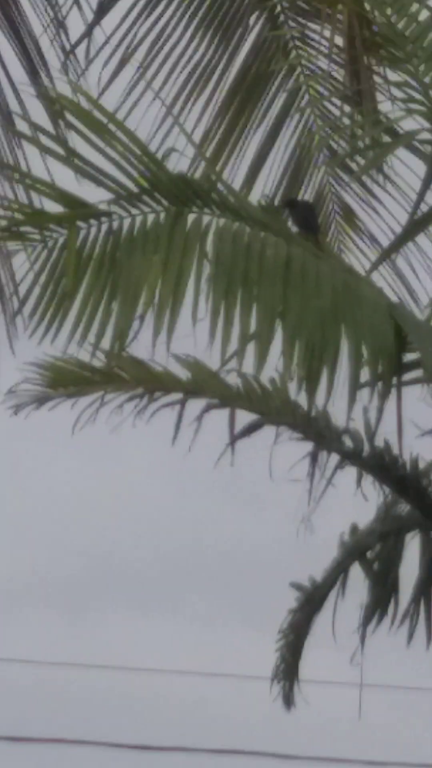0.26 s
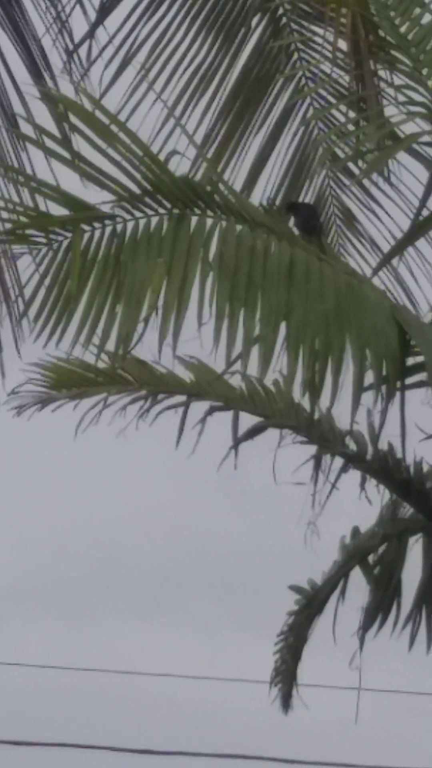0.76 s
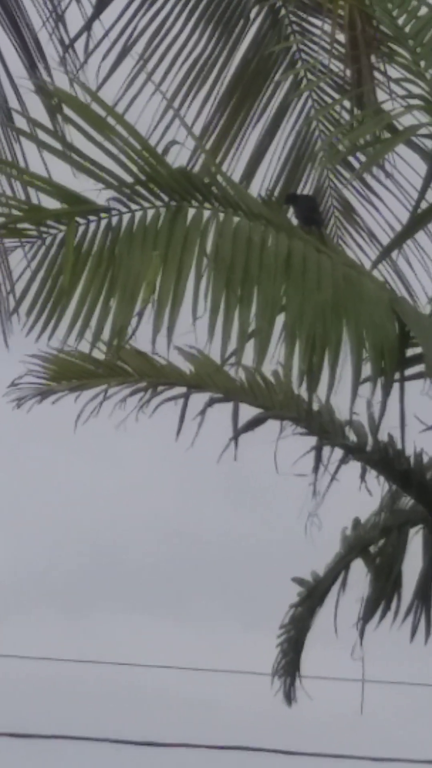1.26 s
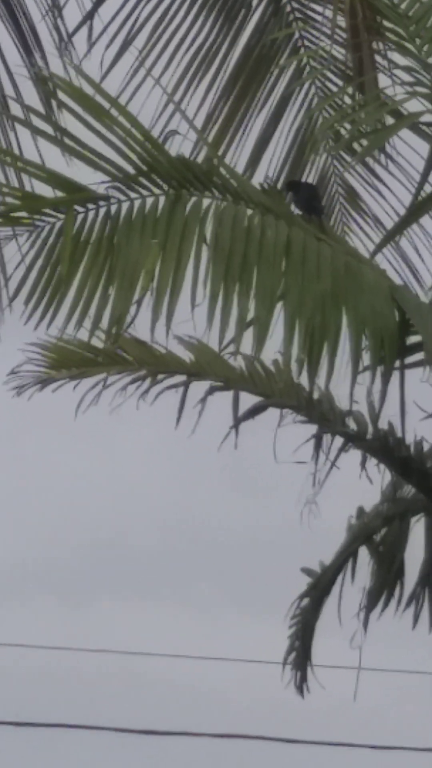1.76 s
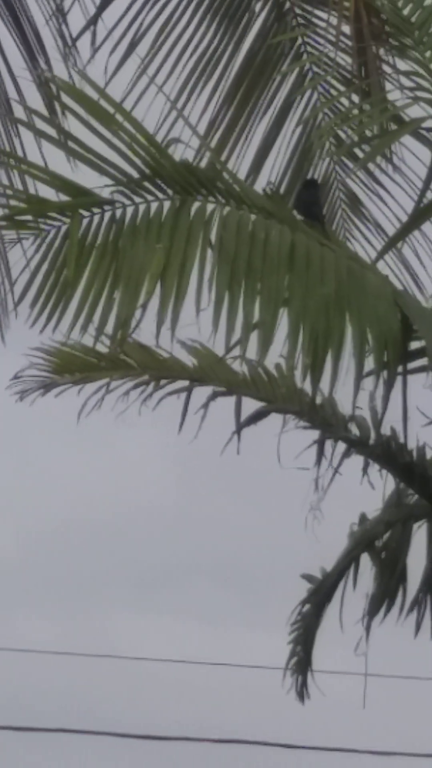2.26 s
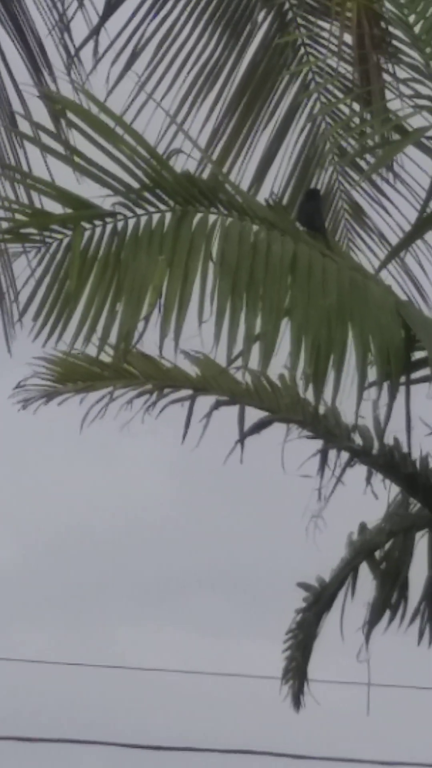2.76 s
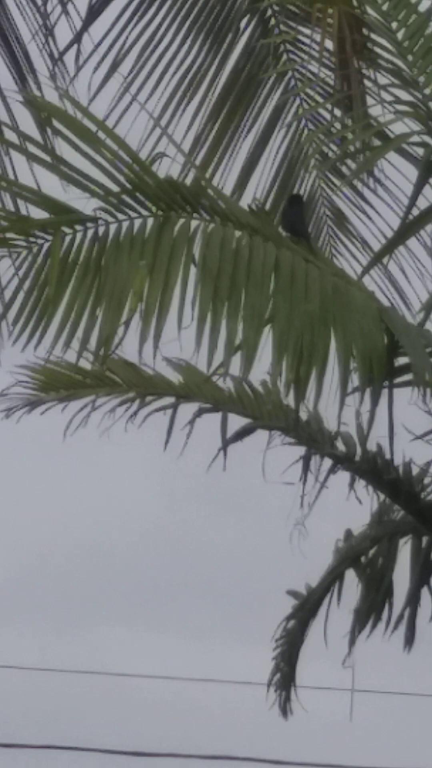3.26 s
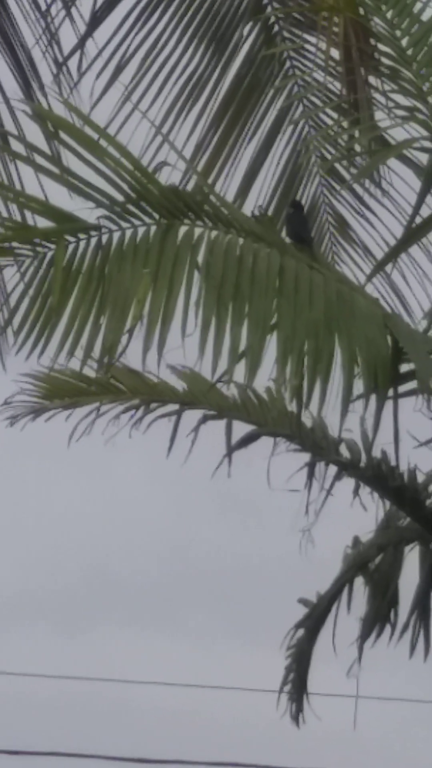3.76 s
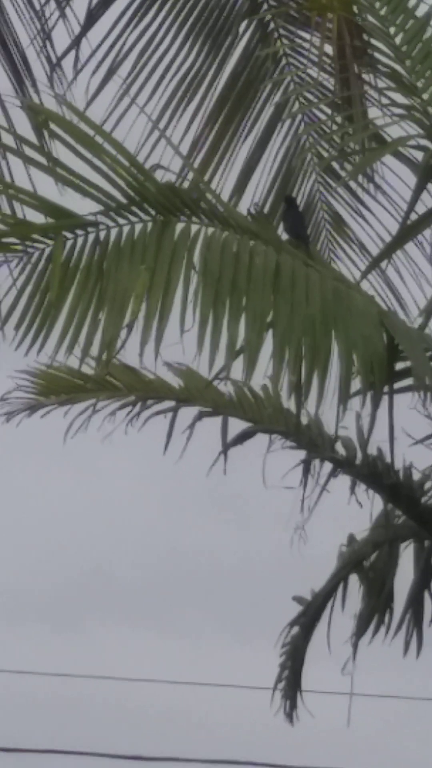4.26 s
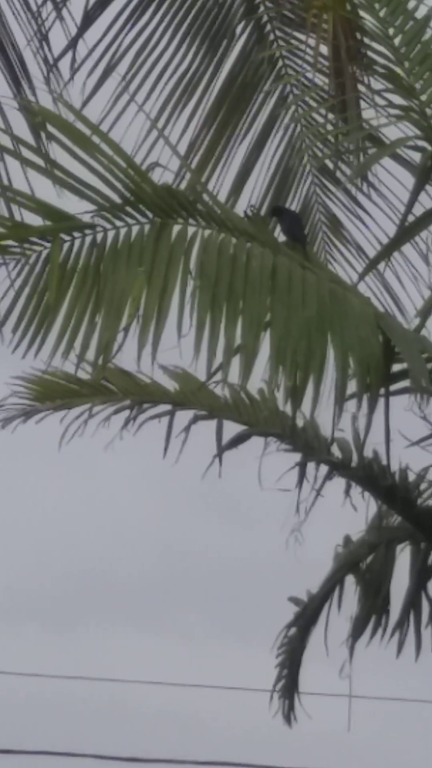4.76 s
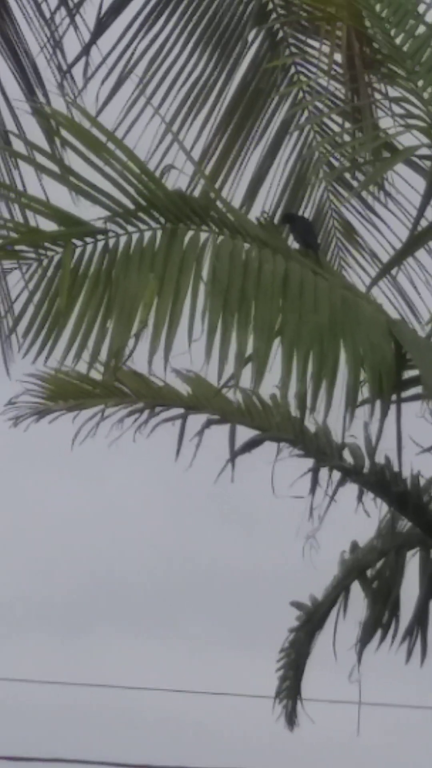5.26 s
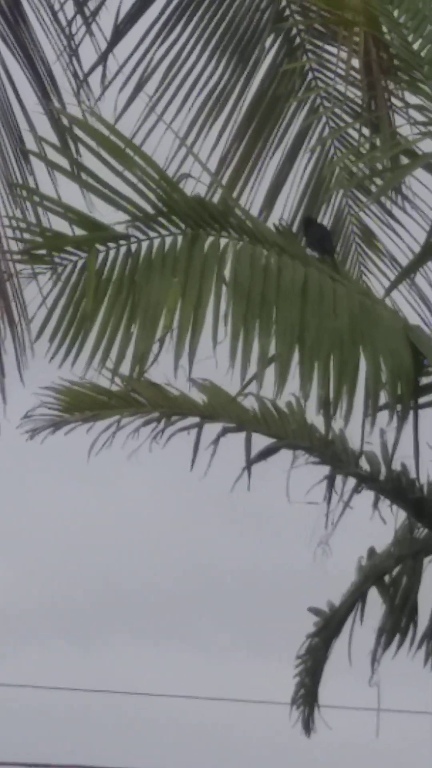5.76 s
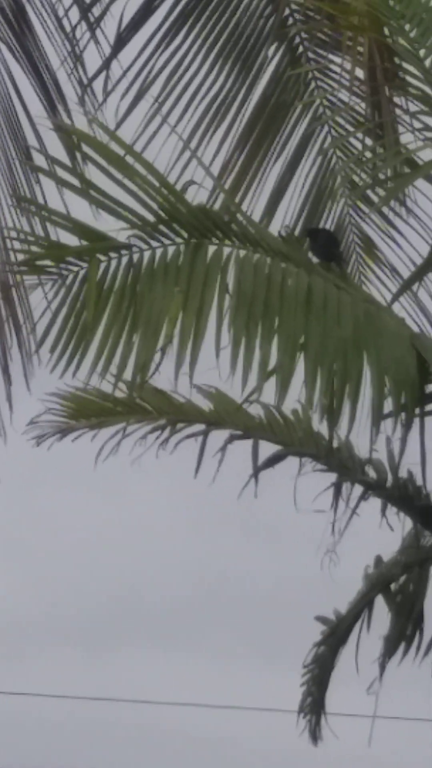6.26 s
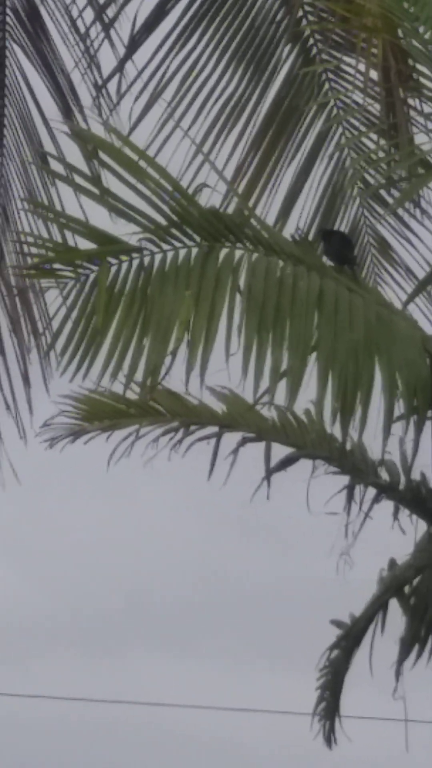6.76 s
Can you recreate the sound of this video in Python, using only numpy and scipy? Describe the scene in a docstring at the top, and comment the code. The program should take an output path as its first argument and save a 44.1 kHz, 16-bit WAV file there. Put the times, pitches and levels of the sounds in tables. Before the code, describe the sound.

Birds call from palms near houses on a still, grey day. Mellow dipping whistles lead throughout the first five and a half seconds, then smaller chirrups and faint chips carry on. One squealing call arches high just before four seconds. Behind them, slow far-off whooshes recur steadily like work strokes, amid soft rumble, leaf hiss and a thin insect band. The outdoor stereo microphone catches clear wall echoes and a little hiss.

```python
"""Dawn birds among palms and houses

A near songbird whistles dipping phrases: frequency-modulated sines that sink, turn and settle.
Other birds chirp, trill and chip further off, with bent, two-voiced or rapidly shaken sines.
Walls throw every note back, by convolution with a decaying noise tail. A dull whoosh of filtered
noise, like a slow work stroke, repeats far away over low town rumble, leaf hiss and insects.
"""
import sys
import numpy as np
from scipy import signal
from scipy.fft import rfft, irfft
from scipy.io import wavfile
from scipy.ndimage import uniform_filter1d

SR = 44100
rng = np.random.default_rng(int(sys.argv[2]) if len(sys.argv) > 2 else 0)


def transcribe(u):
    """Save the signal u as a 16-bit wav file named by the first command-line argument.

    u: samples, shape (n,) or (channels, n), limited to [-1, 1]; the rate is SR.
    q: integer samples, one column per channel.
    """
    v = np.clip(np.atleast_2d(u).T, -1, 1)
    q = np.round(v * 32767).astype(np.int16)
    wavfile.write(sys.argv[1], SR, q)


def boost(x):
    """Linear amplitude factor 10**(x/20) for a level x in decibels (scalar or array-like)."""
    u = np.asarray(x, float) / 20
    return 10 ** u


N = 309582  # samples


def evened(x):
    """Normalisation: scales a signal to rms 1."""
    return x / np.sqrt(np.mean(x ** 2) + 1e-20)


def read(points, hz):
    """Interpolation: reads a curve along a logarithmic frequency axis."""
    f, value = np.transpose(points)
    return np.interp(np.log(hz + 1), np.log(f + 1), value)


def coloured(x, points):
    """Linear filtering: weights each spectral component by a curve in dB."""
    hz = np.fft.rfftfreq(x.shape[-1], 1 / SR)
    return irfft(rfft(x) * boost(read(points, hz)), x.shape[-1])


def add(mix, s, sound):
    """Superposition: adds a sound into the mix at a time in seconds, cut at the edges."""
    at = round(s * SR)
    part = mix[max(at, 0):][:len(sound) + min(at, 0)]
    part += sound[max(-at, 0):][:len(part)]


def wander(count, per_s):
    """Random modulation: noise low-passed at per_s Hz, of rms 1."""
    lowpass = signal.butter(2, per_s, fs=SR, output="sos")
    return evened(signal.sosfilt(lowpass, rng.standard_normal(count + 2000))[2000:])


def along(length):
    """Normalised time: progress 0-1 through a note."""
    return np.linspace(0, 1, round(length * SR))


def whistle(hz, db, fade):
    """Frequency modulation: the syrinx sounds a near sine, its phase the sum of its pitch."""
    phase = 2 * np.pi * np.cumsum(hz) / SR
    soft_ends = signal.windows.tukey(len(hz), np.clip(fade, 0, 1))
    return np.sqrt(2) * boost(db) * np.sin(phase) * soft_ends


def glide(rows, waver, flutter_db, fade):
    """Pitch glide: log frequency follows a parabola through three pitches, a little unsteady."""
    out = np.zeros(N)
    for s, length, start_hz, mid_hz, end_hz, db in rows:
        u = along(length)
        bend = np.polyfit([0, .5, 1], np.log([start_hz, mid_hz, end_hz]), 2)
        hz = np.exp(np.polyval(bend, u)) * (1 + waver * wander(len(u), 88))
        add(out, s, whistle(hz, db + flutter_db * wander(len(u), 86), fade))
    return out


BEND_PER_S, OPENING_FLICK, OPENING_S = 9.8, .261, .0149  # long falls flatten early; a flick opens them
ONSET_DB, HOLD_S, FADE_DB_PER_S = -6, .094, 203  # louder up to the turn, held, then fading


def phrase(start, turn, end, top_hz, turn_hz, settled_hz, settling, db):
    """Exponential relaxation: pitch sinks to the turn, then settles on its last value."""
    t = np.arange(start, end, 1 / SR)
    left = np.clip((turn - t) / (turn - start), 0, 1)
    since = np.maximum(t - turn, 0)
    bend = max(BEND_PER_S * (turn - start), 1)
    flick = OPENING_FLICK * np.exp((start - t) / OPENING_S)
    sink = (top_hz - turn_hz) * (left ** bend + flick)
    settle = (settled_hz - turn_hz) * (1 - np.exp(-since / settling))
    db = db + ONSET_DB * left - FADE_DB_PER_S * np.maximum(since - HOLD_S, 0)
    return uniform_filter1d(turn_hz + sink + settle, 900, mode="nearest"), db


# Whistled phrases of the near bird. Each row: start, turn and end in seconds, top, turning and
# settled pitch in Hz, settling time in seconds, level at the turn in dB.
PHRASES = [(-.15, 0.006, .095, 2400, 2002, 2194, .04, -39),
           (0.183, .35, .555, 2568, 2133, 2381, 0.017, -39),
           (1.229, 1.296, 1.365, 2250, 1513, 1983, 0.032, -42),
           (1.515, 1.801, 1.915, 2380, 2009, 2458, 0.033, -39.5),
           (2.047, 2.153, 2.255, 3120, 2776, 2805, 0.037, -45),
           (2.579, 2.584, 2.66, 1522, 1527, 1707, 0.016, -51.5),
           (2.783, 2.988, 3.145, 2588, 1741, 2150, 0.047, -41.5),
           (3.261, 3.447, 3.57, 2636, 2080, 2303, 0.029, -41),
           (3.849, 3.883, 3.94, 1937, 1948, 2035, 0.028, -47),
           (4.102, 4.209, 4.325, 1959, 1945, 1989, 0.028, -39),
           (4.839, 4.959, 5.165, 2263, 1670, 2227, 0.041, -42.5),
           (5.222, 5.387, 5.452, 2572, 2210, 2756, 0.032, -45.5)]
BEATING, BEATS_PER_S, FULL_GLIDE_HZ_PER_S = .45, 35, 1500  # near reflections beat with a sliding pitch
ENDS_S = .05  # both soft ends together
THIRD_DB, THIRD_DB_PER_KHZ = -36, 20  # third partial at full voice and 2.4 kHz, stronger on high notes


def dipping_whistles():
    """Beating: each whistle and its third partial throb most where the pitch slides."""
    out = np.zeros(N)
    for row in PHRASES:
        hz, db = phrase(*row)
        slide = uniform_filter1d(abs(np.gradient(hz)) * SR / FULL_GLIDE_HZ_PER_S, 1500)
        throb = 1 + BEATING * np.clip(slide, .2, 1) * wander(len(hz), BEATS_PER_S)
        fade = ENDS_S * SR / len(hz)
        # the partial weakens twice as fast in dB as the voice
        third_db = 2 * db - row[-1] + THIRD_DB + THIRD_DB_PER_KHZ * (hz - 2400) / 1e3
        third = throb * whistle(3 * hz, third_db, 2 * fade)
        add(out, row[0], throb * (whistle(hz, db, fade) + third))
    return out


# Vibrato notes of the same bird. Each row: start in seconds, length in seconds, start pitch in Hz,
# end pitch in Hz, vibrato swing in Hz, level in dB before a 2 dB lift.
WARBLE_NOTES = [(1.092, .158, 2340, 2340, 150, -43), (4.525, .14, 3100, 2380, 110, -47)]
WARBLE_PER_S, WARBLE_ONSET_DB = 59, -24
WARBLE_BEND = 2.2  # a falling warble drops early, then levels


def warbles():
    """Vibrato: a fast, slightly irregular sinusoidal swing of pitch around a falling or level note."""
    out = np.zeros(N)
    for s, length, start_hz, end_hz, swing_hz, db in WARBLE_NOTES:
        u = along(length)
        cycle = 2 * np.pi * WARBLE_PER_S * length * u + .7 * wander(len(u), 37.5)
        hz = end_hz + (start_hz - end_hz) * (1 - u) ** WARBLE_BEND + swing_hz * np.sin(cycle)
        db = db + 2 + WARBLE_ONSET_DB * (1 - u) ** 3 + 3.5 * wander(len(u), 60)
        add(out, s, whistle(hz, db, fade=.3))
    return out


def songbird():
    """Superposition: the near bird's dipping whistles and quick vibrato notes."""
    return dipping_whistles() + warbles()


# Soft two-note calls, high then low. Each row: start in seconds, level in dB.
TWO_NOTE_CALLS = [(.615, -56), (.757, -54), (.92, -55)]
DOUBLET_S, DOUBLET_GAP_S = .0357, .022  # length of each note, lag from first onset to second
HIGH_HZ, LOW_HZ = (2080, 2150, 2030), (1777, 1793, 1690)  # start, middle, end
# Rising chirps that level off. Each row: start in seconds, length in seconds, top pitch in Hz,
# level in dB.
RISING_CHIRPS = [(.88, .075, 3500, -63), (1.145, .085, 3680, -65), (2.79, .07, 3600, -70)]
# Other clear glides. Each row: start in seconds, length in seconds, start, middle and end pitch in
# Hz, level in dB.
CLEAR_GLIDES = [(.85, 0.044, 7900, 8200, 8600, -68), (2.195, 0.078, 3200, 3780, 4670, -54),
                (2.4, 0.065, 4400, 4370, 4100, -74), (2.46, 0.058, 2460, 1777, 1610, -58),
                (2.85, 0.089, 8300, 8060, 8160, -65.5), (3.39, 0.1, 8600, 8500, 8370, -80.5),
                (5.34, 0.06, 8500, 8500, 9000, -81.5), (5.575, 0.11, 2770, 3470, 4200, -62)]


def other_birds():
    """Pitch glide: two-note calls, rising chirps and single notes, each bent through three pitches."""
    notes = list(CLEAR_GLIDES)
    for s, db in TWO_NOTE_CALLS:
        notes.append((s, DOUBLET_S, *HIGH_HZ, db))
        notes.append((s + DOUBLET_GAP_S, DOUBLET_S, *LOW_HZ, db))
    for s, length, top_hz, db in RISING_CHIRPS:
        notes.append((s, length, .8 * top_hz, .955 * top_hz, top_hz, db))
    return glide(notes, waver=.013, flutter_db=5, fade=.5)


# Two-voiced chirrups of a small bird. Each row: start in seconds, kind (0 a high call, 1 a lower,
# shorter reply), level of the lower voice in dB.
CHIRRUP_CALLS = [(0.132, 0, -60), (0.255, 1, -64.5), (.508, 0, -56), (.622, 1, -66.5), (0.855, 0, -62.5),
                 (1.263, 0, -62), (1.796, 1, -66), (2.615, 0, -63), (2.74, 1, -62), (3.163, 0, -62),
                 (3.702, 0, -61), (4.348, 0, -63.5), (4.892, 0, -61), (4.998, 1, -68.5), (5.428, 0, -61),
                 (5.558, 1, -68), (5.933, 0, -58), (6.437, 0, -63)]
CHIRRUP_S, CHIRRUP_HZ = (.095, .078), (5757, 5220)  # call, reply


def chirrups():
    """Two-source phonation: both sides of the syrinx jump up, then plunge twice, 420 Hz apart."""
    out = np.zeros(N)
    for s, reply, db in CHIRRUP_CALLS:
        u, hz = along(CHIRRUP_S[round(reply)]), CHIRRUP_HZ[round(reply)]
        jump = .1445 * np.exp(-u / .055)
        plunges = .1666 * (2 * u % 1) ** 3 * np.sqrt(u)
        dips = uniform_filter1d(hz * (1.02 - jump - plunges), 150, mode="nearest")
        dips = dips + 110 * wander(len(u), 200)
        db = db + 2.55 * wander(len(u), 210)
        add(out, s, whistle(dips, db, fade=.42) + whistle(dips + 420, db - 5.5, fade=.1))
    return out


ARCH_S, ARCH_TOP_S, ARCH_END_S, ARCH_WIDTH_S = 3.68, 3.865, 4.02, .12
ARCH_TOP_HZ, ARCH_FOOT_HZ = 7260, 3200
ARCH_DB, ARCH_DB_PER_KHZ, ARCH_OCTAVE_DB = -55, 5.5, -29  # at the top, loss below it, octave re first


def squeal():
    """Harmonic pair: one tall Gaussian arch of pitch with its octave."""
    out = np.zeros(N)
    t = np.arange(ARCH_S, ARCH_END_S, 1 / SR)
    hz = ARCH_FOOT_HZ + (ARCH_TOP_HZ - ARCH_FOOT_HZ) * np.exp(-((t - ARCH_TOP_S) / ARCH_WIDTH_S) ** 2)
    db = ARCH_DB - ARCH_DB_PER_KHZ * (ARCH_TOP_HZ - hz) / 1000
    hz = hz * (1 + .0082 * wander(len(hz), 60))
    db = db + 6.6 * wander(len(hz), 76)
    octave = whistle(2 * hz, db + ARCH_OCTAVE_DB, fade=.12)
    add(out, ARCH_S, whistle(hz, db, fade=.099) + octave)
    return out


# Steep sweeps aimed away, so their echoes outweigh them. Each row: start in seconds, length in
# seconds, start, middle and end pitch in Hz, level in dB before colouring.
STEEP_SWEEPS = [ (1.57, .065, 8500, 5000, 3200, -57), (2.02, .045, 8700, 5200, 3600, -56.5),
                (2.11, .05, 8900, 5300, 3700, -55), (5.9, .03, 6100, 5000, 4650, -60),
                (1.12, 0.019, 4800, 5790, 6100, -62), (1.125, 0.03, 7600, 8100, 9600, -78.5),
                (3.68, 0.059, 6800, 7440, 10800, -72), (5.005, 0.018, 6550, 9000, 12900, -80),
                (6.83, 0.099, 9230, 7900, 6660, -78.5)]


def sweeps():
    """Spectral shading: steep pitch glides, filtered to favour the band around 6 kHz."""
    notes = glide(STEEP_SWEEPS, waver=.011, flutter_db=1.5, fade=.37)
    return coloured(notes, [(3000, -16), (4500, -3.5), (5800, 5), (8500, 2.5)])


# Harsh chips from far off. Each row: start in seconds, length in seconds, centre pitch in Hz,
# level in dB.
FAR_CHIPS = [(0, 0.052, 8600, -66.5), (0.161, .11, 8340, -61), (0.736, .11, 8160, -65.5),
             (0.965, 0.091, 8570, -72), (1.517, 0.13, 7300, -59), (1.671, 0.089, 7550, -59.5),
             (1.807, .29, 6900, -66), (2.767, 0.13, 7370, -58.5), (2.826, 0.038, 8040, -48.5),
             (2.943, .11, 6800, -62.5), (3.567, 0.14, 7460, -63.5), (3.754, 0.13, 7280, -60.5),
             (3.928, .1, 8550, -72), (4.472, 0.13, 6750, -58), (4.657, .12, 6660, -65),
             (4.897, 0.061, 8000, -73), (5, .057, 8260, -63.5), (5.431, 0.092, 7080, -59.5),
             (5.625, .13, 6400, -65.5), (6.201, 0.15, 7340, -68.5), (6.52, .086, 8200, -74),
             (6.872, .15, 6900, -61)]
SPREAD_HZ, SPREAD_PER_HZ = 1050, .45  # swing at 8 kHz; lower chips swing wider


def chips():
    """Wideband frequency modulation: uneven shaking turns a whistle to a buzz, widest mid-note."""
    out = np.zeros(N)
    for s, length, hz, db in FAR_CHIPS:
        spread_hz = SPREAD_HZ + SPREAD_PER_HZ * (8000 - hz)
        u = along(length)
        shake = np.tanh(wander(len(u), 500)) * np.sin(np.pi * u) ** .5
        fall = .2 * (1 - 2 * u)
        add(out, s, whistle(hz + spread_hz * (shake + fall), db, fade=.77))
    return out


# Faint held tones far off. Each row: start in seconds, length in seconds, start, middle and end
# pitch in Hz, level in dB.
HELD_TONES = [(2.2, .4, 245, 245, 240, -71), (5.75, .45, 240, 243, 240, -69),
              (6.75, .27, 240, 245, 245, -70), (4.65, .7, 1000, 1000, 1030, -80),
              (6.3, .55, 4500, 4950, 4200, -84), (6.65, .35, 5400, 5400, 5400, -78),
              (6.24, .07, 3550, 3600, 3600, -80), (6.89, .08, 3550, 3600, 3600, -80)]


def held_tones():
    """Narrow-band tone: nearly steady pitches with a fluttering level."""
    return glide(HELD_TONES, waver=.0047, flutter_db=6.5, fade=.7)


# Whooshes. Each row: start in seconds, thud level in dB, hiss level in dB, both at the swell's peak.
STROKE_TIMES = [(0.302, -45, -54.5), (1.175, -48.5, -60), (2.037, -45.5, -51.5), (2.982, -44.5, -47),
                (3.876, -48, -50), (4.752, -41.5, -48.5), (5.556, -52.5, -52.5), (6.397, -47, -53)]
# Thud spectrum. Each row: frequency in Hz, relative density in dB per Hz.
THUD_SPECTRUM = [(60, -38), (110, -14), (160, 3.5), (205, 0), (243, 1.5), (275, -4.5), (305, -5.5),
                 (400, -7), (550, -17), (800, -59.5)]
# Hiss spectrum. Each row: frequency in Hz, relative density in dB per Hz.
HISS_SPECTRUM = [(300, -14.5), (500, -13), (620, -8.5), (780, -3), (880, -1.5), (990, -4), (1200, -10.5),
                 (1600, -4), (2300, -15), (3500, -32), (6000, -24), (9000, -52)]
STROKE_S, LONGER_S_PER_DB = .24, .007  # length at a -47.5 dB thud; heavier thuds last longer
MIDDLE_LAG_S, TREBLE_LAG_S, HISS_SPLIT_HZ = .03, .042, 1130  # the treble arrives last


def whoosh():
    """Shaped noise: each stroke swells as a dull thud; a gritty hiss follows, brightening as it comes."""
    thud, middle, treble = np.zeros((3, N))
    for s, thud_db, hiss_db in STROKE_TIMES:
        length = STROKE_S + LONGER_S_PER_DB * (thud_db + 47.5)
        swell = np.sin(np.pi * along(length) ** .78) ** 2
        add(thud, s, boost(thud_db) * swell)
        add(middle, s + MIDDLE_LAG_S, boost(hiss_db) * swell)
        add(treble, s + TREBLE_LAG_S, boost(hiss_db) * swell)
    grit = boost(1.9 * wander(N, 84))
    thud_noise, hiss_noise = rng.standard_normal((2, N))
    hiss = evened(grit * coloured(hiss_noise, HISS_SPECTRUM))
    lowpass = signal.butter(2, HISS_SPLIT_HZ, fs=SR, output="sos")
    dull = signal.sosfiltfilt(lowpass, hiss)
    return thud * evened(coloured(thud_noise, THUD_SPECTRUM)) + middle * dull + treble * (hiss - dull)


# Town rumble and leaf hiss. Each row: frequency in Hz, relative density in dB per Hz.
AIR_SPECTRUM = [(18, -16.5), (30, -19.5), (90, 3.5), (120, 5.5), (183, -5.5), (238, -5), (535, -17.5),
                (880, -16), (1240, -19), (1980, -15.5), (2940, -32), (4580, -27), (5800, -33),
                (7350, -30.5), (15700, -65.5)]
AIR_DB, INSECT_DB = -60.5, -78  # middle levels, around which each wanders
INSECT_HZ, INSECT_WIDTH_HZ = 5750, 600


def air():
    """Stationary noise: rumble and leaf hiss with a slow swell, and a thin fluttering band of insects."""
    air_noise, insect_noise = rng.standard_normal((2, N))
    edges = INSECT_HZ + np.array([-.5, .5]) * INSECT_WIDTH_HZ
    bandpass = signal.butter(2, edges, "bandpass", fs=SR, output="sos")
    insects = evened(signal.sosfilt(bandpass, insect_noise))
    rumble = evened(coloured(air_noise, AIR_SPECTRUM))
    swell = boost(AIR_DB + 1.93 * wander(N, .22))
    flutter = boost(INSECT_DB + 2 * wander(N, 22))
    return swell * rumble + flutter * insects


# Decay of the late echoes. Each row: frequency in Hz, time in seconds to fall by 60 dB.
YARD_DECAY = [(150, 0.96), (1000, 1), (2200, 0.73), (5000, 0.89), (9000, 0.51)]
WALLS_S = .105  # the nearest walls answer strongly for this long


def yard(x, build_s, walls_db):
    """Reverberation: strong early answers from walls, then a tail that dies fastest in the high treble."""
    hz, t, z = signal.stft(rng.standard_normal(SR), SR, nperseg=256)
    early_db = walls_db * np.exp(-(t / WALLS_S) ** 8)
    decay_db = -60 * t / read(YARD_DECAY, hz)[:, None]
    tail = signal.istft(z * boost(early_db + decay_db), SR, nperseg=256)[1]
    tail *= 1 - np.exp(-(np.arange(len(tail)) / SR / build_s) ** 2)  # gradual build-up
    return signal.fftconvolve(x, tail / np.linalg.norm(tail))[:N]


def scene():
    """Direct-to-reverberant ratio: each voice has its own balance of direct sound and echo."""
    near, strokes, notes = songbird(), whoosh(), other_birds()
    swept, arch, chatter = sweeps(), squeal(), chirrups()
    held, far = held_tones(), chips()
    direct = near + notes + swept + arch + chatter + held + far + strokes
    near_echo = boost(-8.5) * coloured(near, [(4000, 0), (5500, -20)])
    close_send = near_echo + boost(-8.5) * notes + boost(-5) * chatter
    close_echo = yard(close_send, build_s=.0077, walls_db=8)
    late_echo = yard(boost(7) * swept + boost(-5) * arch + held, build_s=.02, walls_db=5)
    open_echo = yard(boost(-5) * strokes + boost(-7) * far, build_s=.015, walls_db=.5)
    return np.tile(direct + close_echo + late_echo + open_echo + air(), (2, 1))


def roll_off(x):
    """The treble ends steeply here."""
    return signal.sosfilt(signal.butter(12, 16100, fs=SR, output="sos"), x)


# Lean of the stereo pair. Each row: frequency in Hz, level of left over right in dB.
LEAN = [(1100, 0), (1500, 2.5), (1850, 4.2), (2250, 3.2), (2600, 1.2), (2900, 0)]
SELF_NOISE_DB = -76  # of each side's own hiss, before a fifth of the other side's is added


def record(dry):
    """Interchannel level difference: the left port favours a band near 2 kHz; faint hiss is added."""
    lean = [[(hz, side * db / 2) for hz, db in LEAN] for side in (1, -1)]
    ports = np.array([coloured(x, points) for x, points in zip(dry, lean)])
    hiss = boost(SELF_NOISE_DB) * evened(np.diff(rng.standard_normal((2, N + 1))))
    hiss = hiss + .2 * hiss[::-1]
    return roll_off(ports + hiss)


dry = scene()
out = record(dry)
transcribe(out)
```